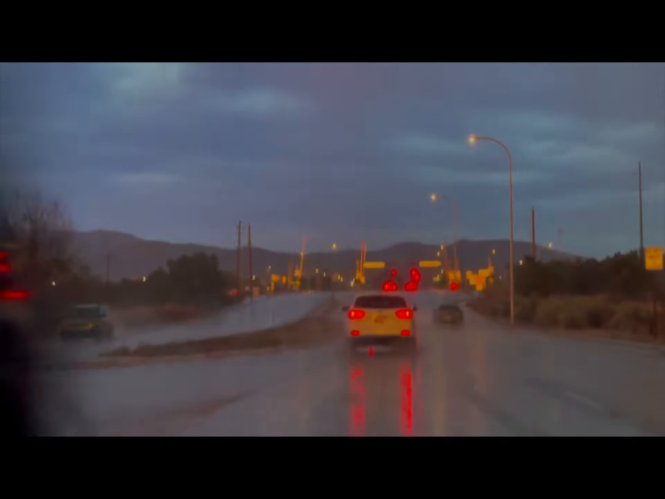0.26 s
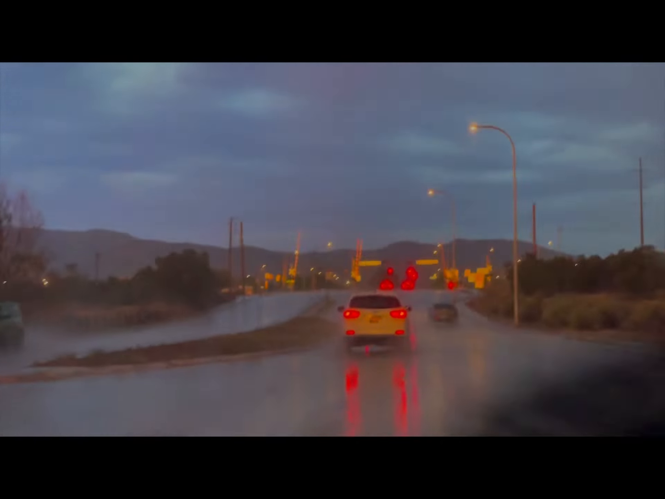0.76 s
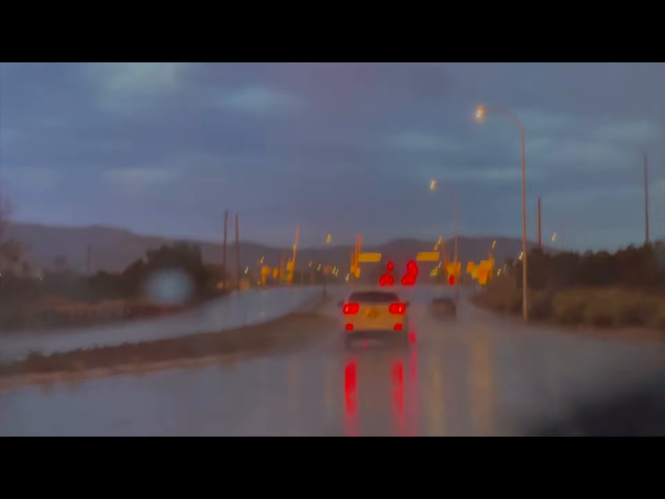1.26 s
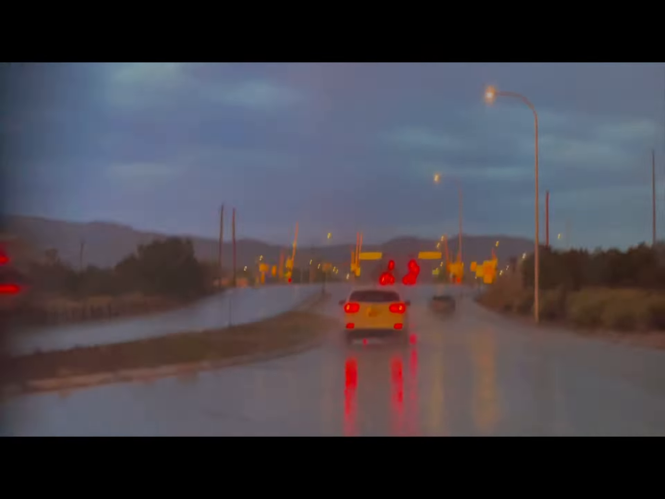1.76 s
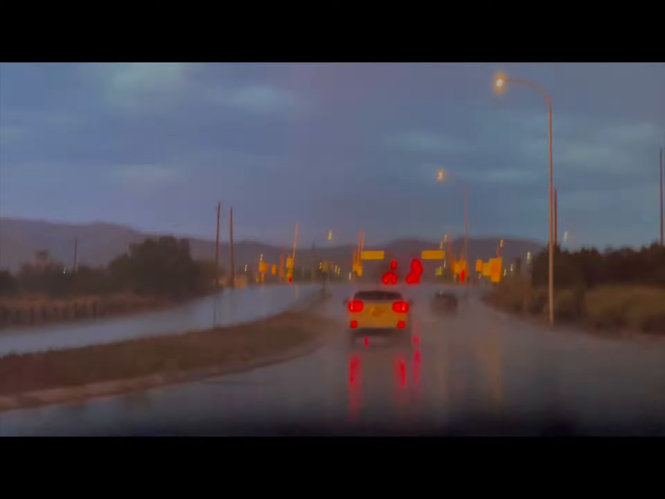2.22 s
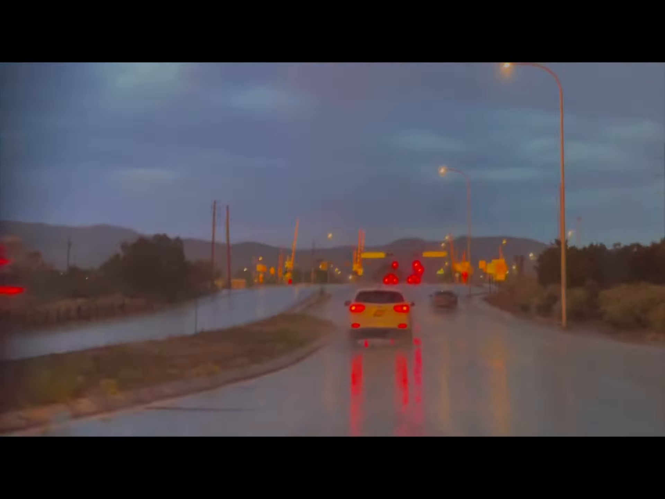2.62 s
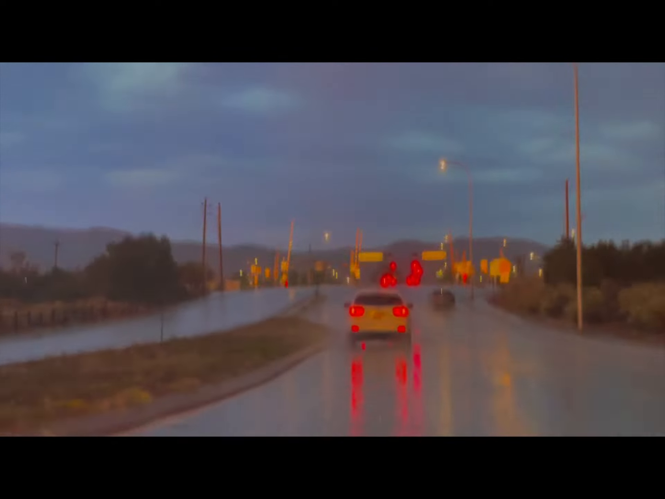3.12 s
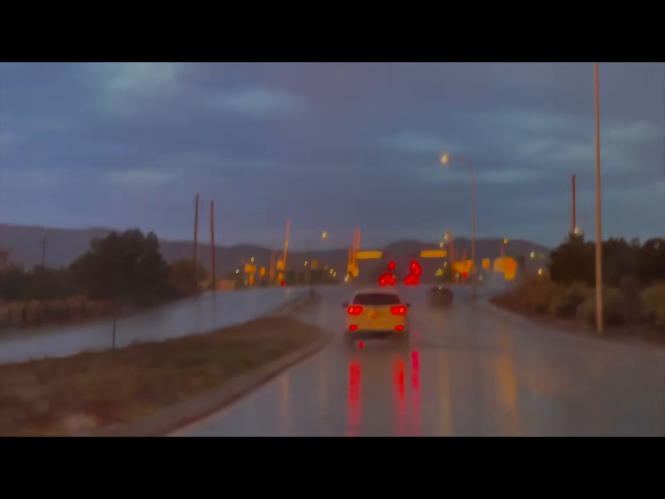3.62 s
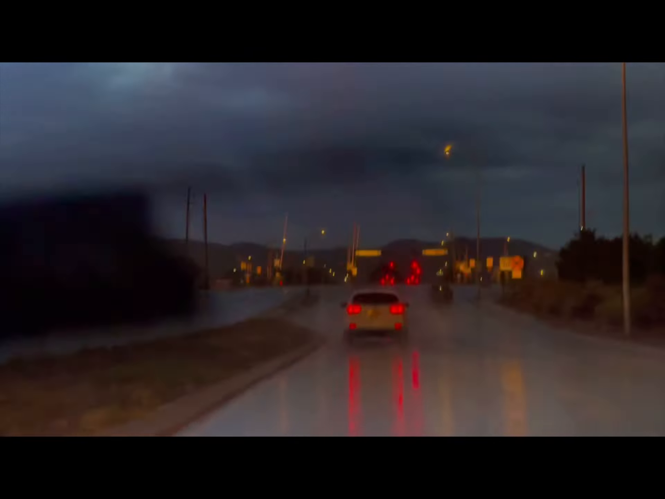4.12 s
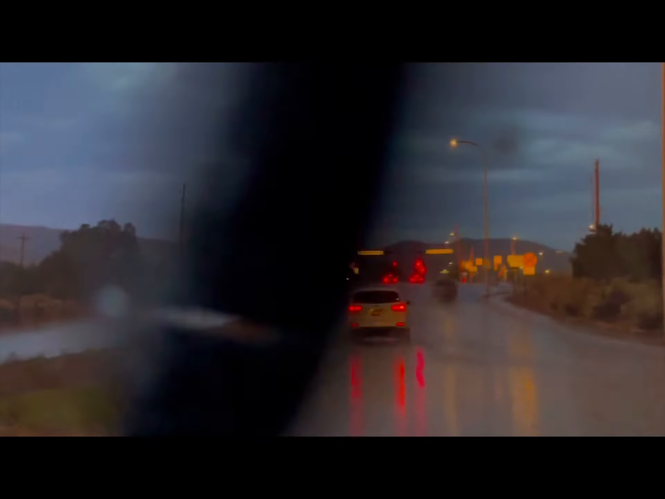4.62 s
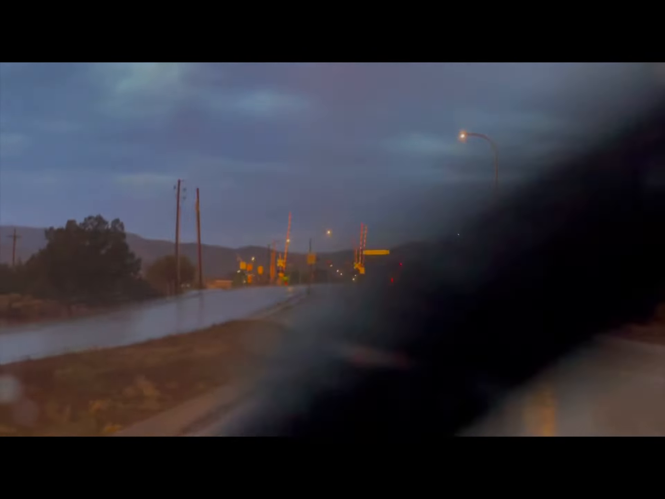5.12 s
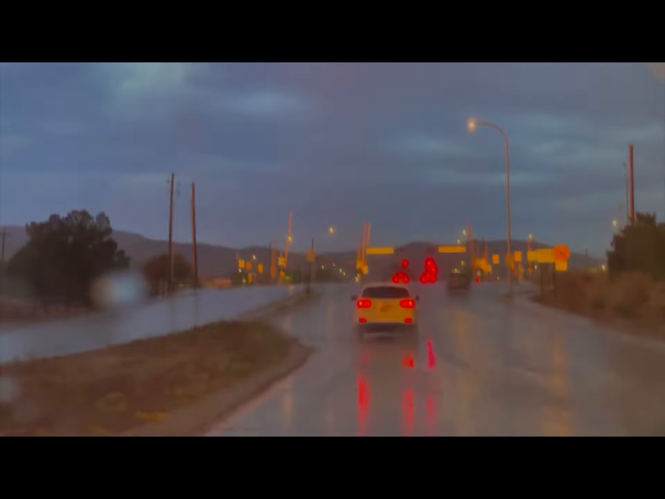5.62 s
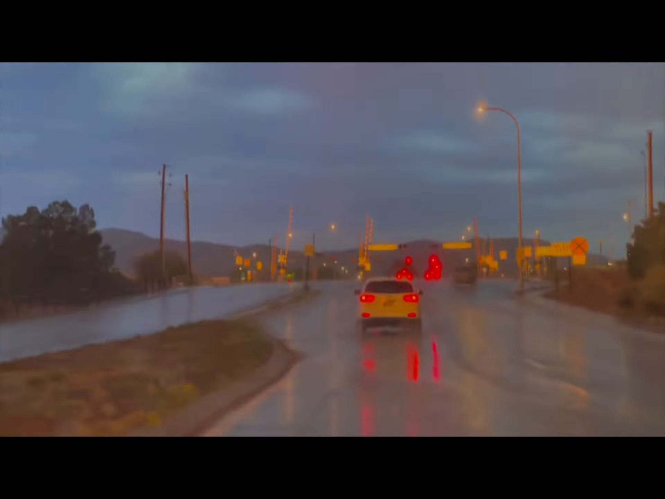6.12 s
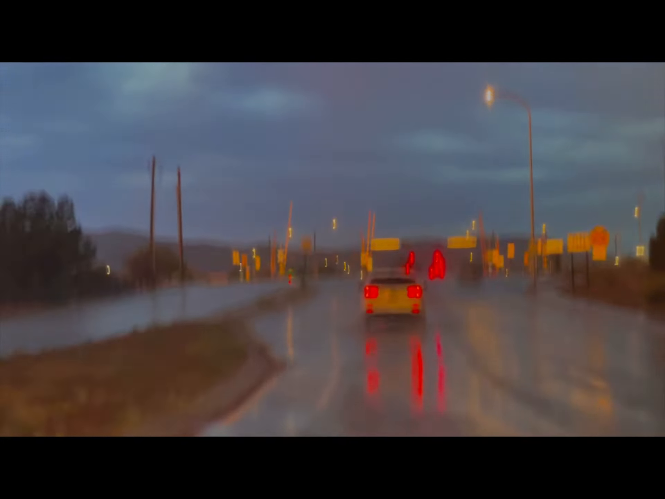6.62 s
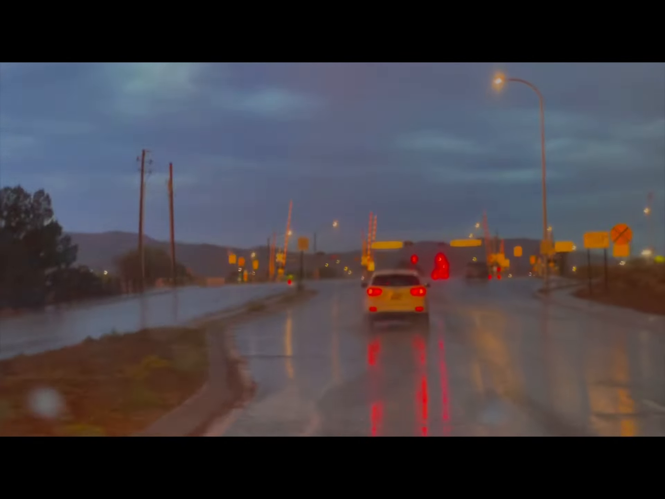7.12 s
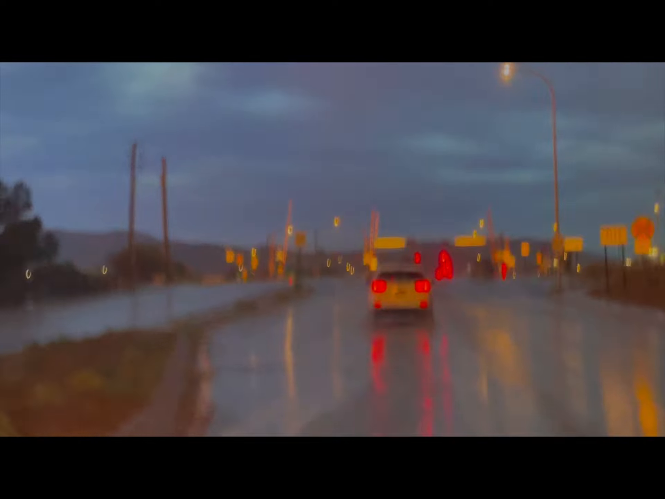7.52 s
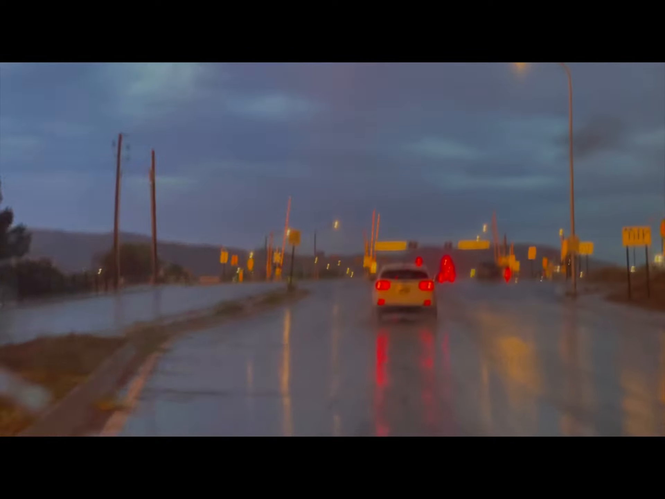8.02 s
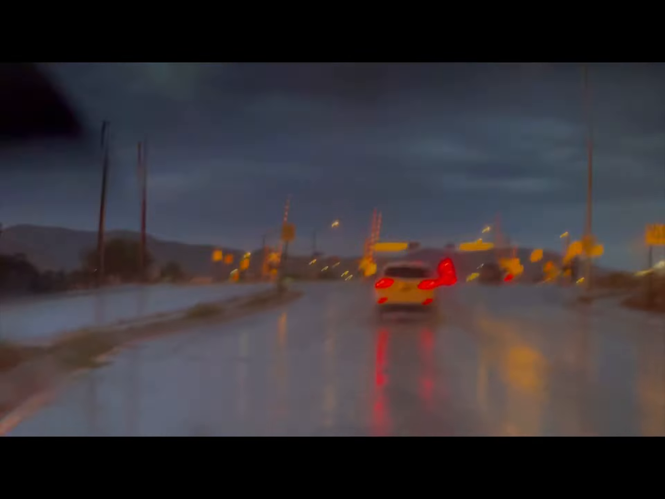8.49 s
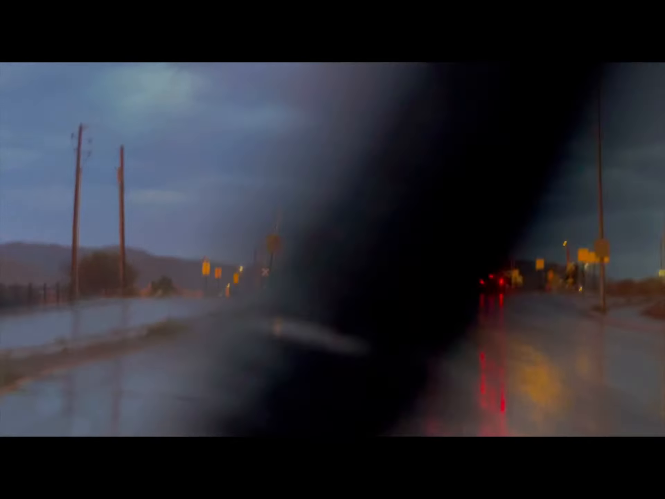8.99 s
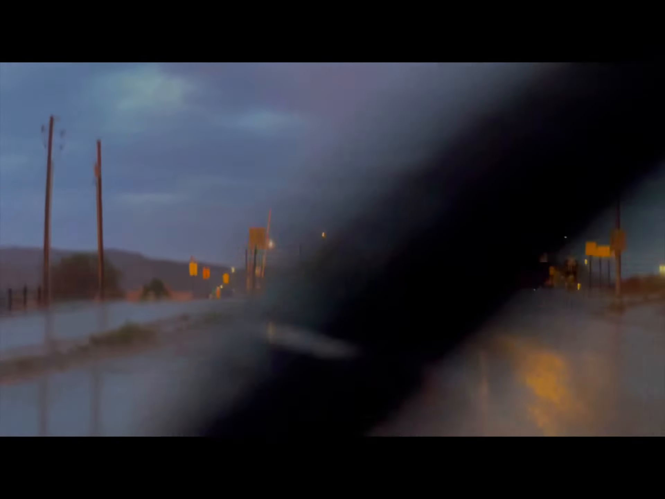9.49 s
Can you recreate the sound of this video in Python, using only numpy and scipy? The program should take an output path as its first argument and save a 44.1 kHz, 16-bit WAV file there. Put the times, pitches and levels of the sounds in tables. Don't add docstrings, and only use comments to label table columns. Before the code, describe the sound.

A stereo dashboard microphone in a car cabin picks up steady low tyre rumble and floor boom throughout. Rain is strongest at the start, then eases gradually with short gusts and lulls, crisp splats and sharp ticks. The wiper blade repeatedly slips and thuds in low, woody clusters, a little over once a second, answered by softer turns and scattered road knocks, denser after seven seconds.

```python
import sys
import numpy as np
from scipy import signal
from scipy.fft import rfft, irfft, next_fast_len
from scipy.io import wavfile
from scipy.ndimage import uniform_filter1d, map_coordinates

SR = 44100
rng = np.random.default_rng(int(sys.argv[2]) if len(sys.argv) > 2 else 0)


def dump_mix(stems):
    frames = np.atleast_2d(stems).T
    limited = np.clip(frames, -1, 1)
    pcm = np.round(limited * 32767).astype(np.int16)
    wavfile.write(sys.argv[1], SR, pcm)


def convert_level_to_amplitude(level_db):
    exponent = np.asarray(level_db, float) / 20
    return 10 ** exponent


N = 429975

# (time [s], level [dB])
RAIN_STRENGTH = [(0.0, -27), (0.6, -35), (1.68, -31), (2.2, -34.5), (2.36, -30.5), (3.34, -36), (3.67, -27),
                 (3.88, -36), (3.91, -31.5), (5.11, -35), (5.4, -30.5), (6.13, -29.5), (6.41, -35),
                 (7.93, -33.5), (8.04, -37.5), (8.66, -41), (8.69, -36.5), (9.75, -36)]
# (time [s], level over the strength [dB])
RAIN_GUSTS = [(0.17, -2), (0.234, 4.5), (0.324, 1), (0.459, -2.2), (0.554, -3), (0.663, 2.1), (0.763, 2.4),
              (0.873, 2), (1.038, -2), (1.527, 3.5), (1.716, 2.0), (1.771, -3.0), (2.115, 3), (2.175, -6),
              (2.499, -4), (2.873, -5), (2.973, 1.5), (3.048, -8), (3.113, 5.5), (3.293, -6), (3.367, -7),
              (3.532, -3.5), (3.637, -6), (3.737, -3), (4.24, 2), (4.615, -5), (4.764, 2), (4.844, 3.5),
              (4.949, -5.5), (5.078, 4), (5.138, -2.2), (5.607, -3.5), (5.662, 1), (5.767, -7),
              (6.216, -3.5), (6.455, -3.5), (6.58, 4), (6.64, -3), (6.725, 4.5), (7.134, -3.5),
              (7.224, 4.5), (7.423, -7), (8.137, 3.5), (8.261, -3.5), (8.511, 4.5), (8.62, -5.5),
              (8.78, 2.4), (9.069, -2.5), (9.139, 4.5), (9.668, -6)]
# (time [s], peak level [dB], brightness [dB])
LARGEST_DROPS = [(0.0357, -9, -26), (0.1166, -15, -26), (0.187, -20, -21), (0.2374, -14, -19),
                 (0.3329, -18, -28), (0.4786, -19, -35), (0.5783, -14.5, -23), (0.664, -14, -19),
                 (0.827, -23, -31), (0.8727, -16, -30), (0.9258, -15, -21), (0.996, -19, -22),
                 (1.187, -25, -18), (1.26, -12.5, -20), (1.4456, -14, -15), (1.5997, -17, -21),
                 (1.737, -15.5, -16), (1.8415, -15, -21), (2.0418, -15, -17), (2.0983, -16, -22),
                 (2.201, -17, -31), (2.74, -11, -18), (2.958, -14.5, -16), (3.307, -20, -17),
                 (3.3957, -21.5, -16), (3.5536, -18, -17), (3.6027, -14, -18), (3.6461, -23, -19),
                 (4.0637, -16, -15), (4.2332, -16, -25), (4.284, -19, -28), (4.5757, -14.5, -19),
                 (4.6306, -17, -25), (4.719, -16.5, -25), (4.8386, -12, -23), (4.917, -15, -15),
                 (4.998, -15.5, -25), (5.042, -14, -23), (5.1806, -16.5, -22), (5.3967, -17, -15),
                 (5.434, -11, -19), (5.502, -22, -17), (5.5852, -17, -29), (5.664, -10, -24),
                 (5.7887, -28, -15), (5.89, -14, -19), (6.112, -14, -27), (6.4123, -27, -31),
                 (6.5996, -18, -16), (6.7126, -17, -18), (6.9024, -18, -21), (7.207, -18.5, -25),
                 (7.305, -11.5, -26), (8.4997, -16, -28), (8.5794, -20, -18), (8.6556, -22, -25),
                 (8.861, -18, -24), (8.8972, -16.5, -24), (9.0077, -20, -21), (9.6884, -15, -25)]
# (frequency [Hz], density [dB per Hz])
PATTER_COLOUR = [(530, -5), (900, -5.5), (1240, -7.5), (1570, -7.5), (1990, -3), (2250, -5), (2600, -1.5),
                 (3280, -3.5), (4160, -5), (5300, -7), (5750, -12), (6150, -9.5), (7050, -11.5),
                 (8600, -23), (10000, -86)]
# (frequency [Hz], density [dB per Hz])
SPLASH_COLOUR = [(7500, -40), (8400, -12.5), (9300, -7.5), (10200, -6.5), (11000, -5.5), (12100, -2),
                 (13500, -5), (15500, -10), (16000, -30), (16600, -120)]
# (frequency [Hz], density [dB per Hz])
RAIN_SIDE_COLOUR = [(1300, -60), (2020, -17), (2940, 0), (3310, -2), (4290, -8.5), (5940, -5), (6630, -7),
                    (7460, -3.5), (9100, -4), (11800, -11.5), (12800, -17), (14000, -25), (15700, -26),
                    (16300, -80)]
# (frequency [Hz], share [-1..1])
LATE_SHARE = [(1700, 0), (2400, .25), (3100, 0.7), (4400, 0.4), (5250, .6), (5700, -.65), (7300, -.7),
              (8100, -.55), (9300, .35), (10700, .65), (12100, .6), (13400, 0)]
# (time [s], roughness level [dB], floor pan boom level [dB])
ROAD_SURFACE = [(0.0, -21.5, -22), (0.38, -24.5, -20), (0.87, -23.5, -19), (1.3, -27.5, -17),
                (1.63, -23, -22.5), (2.5, -21.5, -23), (2.96, -26.5, -21), (3.37, -23.5, -23),
                (3.8, -23.5, -21), (4.34, -23.5, -21.5), (5.81, -24, -19.5), (6.13, -18.5, -17.5),
                (6.38, -21.5, -23.5), (7.33, -21, -20), (8.33, -21.5, -17), (9.15, -26.5, -24.5),
                (9.45, -23, -22.5), (9.75, -21.5, -19)]
# (frequency [Hz], density [dB per Hz])
BOOM_COLOUR = [(15, -66), (25, -14), (36, -4), (43, -2.5), (50, 6), (57, -6.5), (64, -0.5), (80, -42),
               (120, -120)]
# (frequency [Hz], density [dB per Hz])
RUMBLE_COLOUR = [(35, -37), (60, -4.5), (96, 1.5), (151, -6), (221, -8.5), (270, -18.5), (350, -23.5),
                 (590, -120)]
# (frequency [Hz], density [dB per Hz])
ROAR_COLOUR = [(130, -18.5), (220, -3.5), (281, -6.5), (516, -13), (1100, -25.5), (1230, -21),
               (1550, -29.5), (1800, -28), (2340, -31), (3960, -120)]
# (frequency [Hz], level [dB])
SIDE_UNDER_MID = [(25, -34), (45, -30), (70, -10), (180, -15), (400, -5.5), (800, -0.5), (1200, -1.5),
                  (1700, -11.5)]
# (time [s], peak level [dB], pitch [Hz])
RUBBER_SLIPS = [(0.091, -13, 199), (0.1202, -8, 210), (0.1505, -7, 199), (0.2056, -18.0, 187),
                (0.9419, -20, 188), (0.965, -17, 336), (0.995, -5.5, 186), (1.0305, -12, 205),
                (1.0584, -17, 210), (1.8145, -12, 199), (1.8311, -20, 230), (1.8786, -9.7, 199),
                (1.9157, -21, 215), (2.6836, -15.1, 199), (2.7005, -13.5, 210), (2.716, -16, 258),
                (2.7462, -10, 219), (2.7713, -18, 237), (2.7922, -12, 188), (3.5403, -4, 200),
                (3.5724, -10, 205), (3.5858, -13, 210), (3.5983, -12, 183), (3.621, -8.5, 223),
                (3.6514, -16, 215), (4.418, -4, 198), (4.4648, -7, 209), (4.521, -17, 183),
                (5.2743, -14, 198), (5.3076, -15, 210), (5.3242, -10.2, 245), (5.3374, -8.5, 221),
                (6.144, -14, 219), (6.1912, -6, 211), (6.214, -12, 226), (6.2478, -18, 205),
                (6.9856, -17.5, 183), (7.0154, -10, 200), (7.0288, -7, 196), (7.0472, -6, 199),
                (7.0657, -11, 207), (7.1016, -21, 221), (7.8692, -9.2, 210), (7.9072, -17, 262),
                (7.9359, -10.4, 199), (7.957, -19, 258), (7.9778, -9.5, 198), (8.7074, -20, 210),
                (8.7394, -6, 205), (8.7649, -8.5, 230), (8.79, -3.5, 209), (8.818, -8, 195),
                (9.582, -12, 212), (9.6045, -9.4, 199), (9.623, -16.3, 205), (9.6373, -14, 226),
                (9.653, -12.7, 221), (9.668, -13, 221), (9.6833, -16, 239), (9.7007, -15.3, 231)]
# (time [s], peak level [dB], pitch [Hz])
DASHBOARD_BUMPS = [(0.0135, -13, 194), (0.6074, -10, 195), (0.635, -16, 192), (0.9046, -12, 176),
                   (1.514, -12, 192), (1.7563, -13, 185), (2.3376, -12, 200), (2.363, -15.2, 215),
                   (2.385, -10, 194), (2.5875, -15.9, 185), (2.6232, -13, 194), (3.19, -11.5, 210),
                   (3.2118, -16, 192), (3.4534, -14, 183), (4.0775, -13.5, 233), (4.0915, -15, 284),
                   (4.135, -15.7, 238), (4.3368, -8, 183), (4.5404, -17, 183), (4.9273, -10.5, 205),
                   (4.949, -13, 278), (5.793, -9, 199), (5.8163, -8.5, 284), (5.836, -15, 194),
                   (6.0349, -16, 252), (6.064, -17, 199), (6.2704, -15.9, 199), (6.3922, -15, 205),
                   (6.4783, -15, 210), (6.6677, -10, 228), (6.6948, -15.4, 225), (7.1267, -17, 183),
                   (7.1762, -20, 194), (7.207, -23, 210), (7.2513, -13.5, 194), (7.368, -14.7, 186),
                   (7.5186, -12, 207), (7.5495, -15, 258), (7.589, -11.5, 211), (7.778, -16.1, 205),
                   (7.7903, -12.5, 211), (8.0052, -15.2, 205), (8.048, -14, 199), (8.066, -12, 208),
                   (8.0944, -10, 193), (8.159, -14.5, 253), (8.2071, -12, 220), (8.2886, -11, 199),
                   (8.3778, -10, 208), (8.4054, -12, 185), (8.4272, -17, 226), (8.4841, -18, 232),
                   (8.6885, -15, 178), (8.8573, -13.4, 197), (9.2337, -10, 231), (9.2578, -13.5, 275),
                   (9.2774, -15.6, 204), (9.4992, -21, 217), (9.7225, -18, 188), (9.737, -16, 205)]
# (time [s], peak level [dB])
NEAR_DROPS = [(0.024, -26), (0.5771, -26), (0.7412, -28), (1.1179, -21), (1.1488, -25), (1.1927, -28),
              (1.2136, -26), (1.5983, -29), (1.736, -23), (1.8407, -25), (1.9061, -24), (1.9834, -27),
              (2.0408, -27), (2.602, -24), (2.7053, -23), (2.7387, -25), (2.957, -22), (3.1722, -28),
              (3.1951, -32), (3.3358, -24), (3.3737, -29), (3.4256, -23), (3.4915, -28), (3.5508, -25),
              (3.6012, -26), (3.894, -22), (3.9639, -30), (4.0662, -19), (4.1395, -25), (4.2223, -26),
              (4.4019, -23), (4.5735, -23), (4.6044, -28), (4.7177, -30), (4.808, -29), (4.8369, -27),
              (4.9257, -22), (4.9975, -28), (5.0404, -28), (5.2574, -26), (5.3717, -30), (5.4101, -29),
              (5.4345, -26), (5.4864, -24), (5.5358, -23), (5.6635, -25), (5.7922, -28), (5.9474, -28),
              (6.0292, -27), (6.1938, -25), (6.7106, -24), (6.8285, -20), (6.99, -29), (7.3038, -32),
              (7.4879, -22), (8.5794, -35), (8.6842, -30), (8.77, -29), (9.0773, -33), (9.6914, -32)]
# (frequency [Hz], density [dB per Hz])
TICK_COLOUR = [(2500, -40), (4500, -12), (7000, -3), (8800, -8), (10500, -5), (12500, 1), (15500, -7),
               (16300, -20), (16650, -120)]
# (judder level [dB], arm ring [dB])
BOTTOM_TURNS = [(-11, 0), (-12.5, -11), (-10.5, -10), (-11.5, -12), (-11, 0), (-11, 7), (-10, 6.5),
                (-11, -16), (-12, 15.5), (-9.5, -1), (-11.5, 6), (-11.5, -3)]
# (judder level [dB], arm ring [dB])
TOP_TURNS = [(-22.5, 9), (-26, 10), (-22, 1), (-30, -1), (-21.5, -4), (-20, -7), (-19, -3), (-23.5, 5),
             (-22.5, 13), (-27, 9), (-31, 4)]
# (frequency [Hz], density [dB per Hz])
BLADE_COLOUR = [(53, -58), (90, -10), (145, -4.5), (208, -1.5), (311, -7), (583, -8.5), (900, -19),
                (1400, -27), (2300, -36), (3900, -120)]
# (frequency [Hz], density [dB per Hz])
ARM_COLOUR = [(90, -120), (150, -14), (185, -8), (202, 6), (220, -19), (280, -51), (500, -120)]


def unit(x):
    return x / np.sqrt(np.mean(x ** 2) + 1e-20)


def along(points, hz):
    f, v = np.transpose(points)
    return np.interp(np.log(hz + 1), np.log(f + 1), v)


def curves(rows):
    s, *columns = np.transpose(rows)
    return [np.interp(np.arange(N) / SR, s, c) for c in columns]


def wobble(rate):
    return map_coordinates(rng.standard_normal(int(N * rate / SR) + 4), [np.arange(N) * rate / SR])


def coloured(x, *spectra):
    m = next_fast_len(N + 8192)
    hz = np.fft.rfftfreq(m, 1 / SR)
    gain = unit(convert_level_to_amplitude(along(spectra[0], hz))) * convert_level_to_amplitude(sum(along(s, hz) for s in spectra[1:]))
    return irfft(rfft(x, m) * gain, m)[:N]


def bursts(times, db, rise, t60, tail_db, tail_t60):
    at = np.clip((times - rise) * SR, 0, N - 1).astype(int)
    blows = np.bincount(at, convert_level_to_amplitude(2 * db), N)
    t = np.arange(SR // 8) / SR
    power = convert_level_to_amplitude(-120 * t / t60) + convert_level_to_amplitude(2 * tail_db - 120 * t / tail_t60)
    power = power * (1 - np.exp(-(t / rise) ** 2))
    return np.sqrt(np.abs(signal.fftconvolve(blows, power)[:N])) * rng.standard_normal(N)


def wide(x, other, left_db):
    lean = (convert_level_to_amplitude(left_db) - 1) / (convert_level_to_amplitude(left_db) + 1)
    return np.array([x, coloured(other, [(1, 0)], SIDE_UNDER_MID) + x * lean])


def ports(mid, side):
    m, s = rfft(mid), rfft(side)
    share = np.clip(along(LATE_SHARE, np.fft.rfftfreq(N, 1 / SR)), -1, 1)
    side_power = uniform_filter1d(np.abs(s) ** 2, size=2000)
    mid_power = uniform_filter1d(np.abs(m) ** 2, size=2000)
    ratio = np.sqrt(side_power / mid_power)
    return irfft(np.sqrt(1 - share ** 2) * s + 1j * share * np.abs(ratio) * m, N)


def rain():
    gust_half_s, gust_depth = 0.021, 0.94
    splash_under_db, splash_swing = -15.5, 1.2
    t = np.arange(N) / SR
    patter_db, = curves(RAIN_STRENGTH)
    gusts_db = sum(db * np.exp(-((t - s) / gust_half_s) ** 2) for s, db in RAIN_GUSTS)
    patter_db = patter_db + gust_depth * gusts_db
    splash_db = patter_db + splash_under_db + (splash_swing - 1) * (patter_db - patter_db.mean())

    draw = rng.random((4500, 2))
    own = rng.standard_normal((4500, 4))
    small_s = draw[:, 0] * N / SR
    at = (small_s * SR).astype(int)
    flurry = 0.3 * wobble(8.2) + 1.36 * wobble(70)
    size = -4.5 * np.log(1 - draw[:, 1]) + flurry[at]

    medium_s, fat = rng.random(110) * N / SR, rng.standard_normal((110, 2))
    medium_db = patter_db[(medium_s * SR).astype(int)] + 17.5 + 3.5 * np.minimum(fat[:, 0], 0.6)
    medium_bright_db = -21.5 + 3 * fat[:, 1]
    largest = np.transpose(LARGEST_DROPS) + [[0], [4.5], [-1.4]]
    big_s, big_db, bright_db = np.hstack([largest, [medium_s, medium_db, medium_bright_db]])
    times = np.concatenate([small_s, big_s])

    def layer(level_db, small_db, large_db, rise, t60, tail_db, spray_db, *spectra):
        db = np.concatenate([level_db[at] + np.minimum(small_db, 12) + 3.5, large_db])
        spray = convert_level_to_amplitude(level_db + spray_db - 2.0 + 1.97 * flurry) * rng.standard_normal(N)
        return coloured(bursts(times, db, rise, t60, tail_db, 0.039) + spray, *spectra)

    roof = layer(patter_db, size + 5.1 * own[:, 0] - 4, big_db - 3.5, 0.00058, 0.0061, -16.5, -3.5,
                 PATTER_COLOUR, [(3300, 2), (4700, -5.0), (6000, -98)])
    glass = layer(patter_db, size + 3 * own[:, 1] - 4, big_db - 4.5, 0.00059, 0.0065, -19.5, -8.5,
                  PATTER_COLOUR, [(2000, -83), (3300, -34.0), (4700, 0.5)])
    splash = layer(splash_db, 1.76 * size + 3.6 * own[:, 2] - 4, big_db + bright_db + 7.5,
                   0.00056, 0.0045, -17.5, -8.0, SPLASH_COLOUR)
    side = layer(splash_db + 7.0, 1.46 * size + 2.4 * own[:, 3] - 5, big_db - 9.0,
                 0.00071, 0.0041, -15.5, -2, RAIN_SIDE_COLOUR)
    lean = coloured(roof, [(1, 0)], [(1100, -9), (1700, -60)])
    mid = roof + glass + splash
    return np.array([mid, ports(mid, side) + lean])


def road():
    roar_under_db, roar_follows = -8.5, 0.55
    tyre_db, boom_db = curves(ROAD_SURFACE)
    roar_db = tyre_db.mean() + roar_under_db + roar_follows * (tyre_db - tyre_db.mean()) + 1.2 * wobble(3.9)
    boom_db = boom_db - 2.0 + 1.35 * wobble(7)
    lumps = 0.86 * wobble(11) + 1.5 * wobble(25)

    def cabin():
        noise = rng.standard_normal((3, N))
        boom = convert_level_to_amplitude(boom_db) * coloured(noise[0], BOOM_COLOUR)
        rumble = convert_level_to_amplitude(tyre_db + 2.5 + lumps) * coloured(noise[1], RUMBLE_COLOUR)
        roar = convert_level_to_amplitude(roar_db + 1.14 + 1.38 * lumps) * coloured(noise[2], ROAR_COLOUR)
        return boom + rumble + roar

    return wide(cabin(), cabin(), left_db=1.3)


def knocks():
    rise_s, t60_s, ring_db = 0.00493, 0.071, -2
    slip_scrape_db, bump_scrape_db = -4.5, -8
    s, db, hz = np.transpose(RUBBER_SLIPS + DASHBOARD_BUMPS)[:, :, None]
    t = np.arange(SR // 8) / SR
    phase = 2 * np.pi * rng.random(s.shape)
    swell = convert_level_to_amplitude(db + ring_db - 60 * t / t60_s) * (1 - np.exp(-(t / rise_s) ** 2))
    ring = swell * 2 * np.sin(2 * np.pi * hz * t + phase)
    at = ((s - rise_s) * SR).astype(int) + np.arange(len(t))
    rings = np.bincount(np.clip(at, 0, N).ravel(), ring.ravel(), N + 1)[:N]
    counts = [len(RUBBER_SLIPS), len(DASHBOARD_BUMPS)]
    scrape_db = db.ravel() + np.repeat([slip_scrape_db, bump_scrape_db], counts)

    def scrape():
        return coloured(bursts(s.ravel(), scrape_db, 0.0043, 0.036, -14, 0.093), BLADE_COLOUR)

    late_rings = np.roll(rings, 40)
    return wide(rings + scrape(), scrape() + 0.43 * late_rings, left_db=1.5)


def ticks():
    s, db = np.transpose(NEAR_DROPS)
    mid = coloured(bursts(s, db - 1, 0.00035, 0.0059, -16, 0.027), TICK_COLOUR)
    side = coloured(bursts(s, db - 2, 0.0004, 0.005, -18, 0.03), RAIN_SIDE_COLOUR)
    return np.array([mid, side])


def wipers():
    cycle_s, first_bottom_s, first_top_s = 0.863, 0.083, 0.618
    bottom_length_s, bottom_swell_db = 0.1, -1.3
    top_length_s, top_swell_db = 0.053, -7.5
    snap_after_s, snap_db, snap_hz, snap_t60_s = 0.076, 7, 143, 0.043
    turns = [(first_bottom_s + k * cycle_s, *row, bottom_length_s, bottom_swell_db)
             for k, row in enumerate(BOTTOM_TURNS)]
    turns += [(first_top_s + k * cycle_s, *row, top_length_s, top_swell_db)
              for k, row in enumerate(TOP_TURNS)]
    s, db, ring_db, length, swell_db = np.transpose(turns)[:, :, None]

    draw = rng.random((2, len(s), 14))
    place = (np.arange(14) + draw[0]) / 14
    times = (s + length * place).ravel()
    slip_db = db - 5 + 6 * (draw[1] - 0.6) + 2 * swell_db * (place - 0.5) - 11 * (place - 0.5) ** 2
    thump_db = slip_db.ravel() + 4.0
    arm_db = (slip_db + ring_db).ravel() - 6.5

    def heard():
        thump = coloured(bursts(times, thump_db, 0.0025, 0.029, -14, 0.11), BLADE_COLOUR)
        return thump + coloured(bursts(times, arm_db, 0.0033, 0.062, -11.0, 0.19), ARM_COLOUR)

    bottom = len(BOTTOM_TURNS)
    jitter = 0.0099 * (draw[0, :bottom, :1] - 0.5)
    t = np.arange(N) / SR - s[:bottom] - snap_after_s - jitter
    decay = convert_level_to_amplitude(db[:bottom] + snap_db - 60 * np.abs(t) / snap_t60_s) * (t > 0)
    thud = decay * np.sin(-2 * np.pi * snap_hz * t)
    return wide(heard() + thud.sum(axis=0), heard(), left_db=2.0)


def scene():
    mid, side = rain() + road() + knocks() + ticks() + wipers()
    return np.array([mid + side, mid - side])


def band_limit(x):
    return signal.sosfilt(signal.butter(12, 16670, fs=SR, output="sos"), x)


def record(dry):
    held = dry / (1 + np.abs(dry) ** 8) ** (1 / 8)
    return band_limit(held)


dry = scene()
out = record(dry)
dump_mix(out)
```